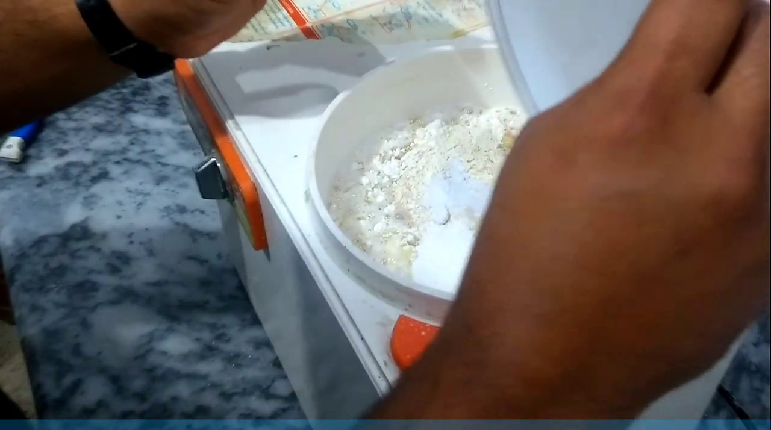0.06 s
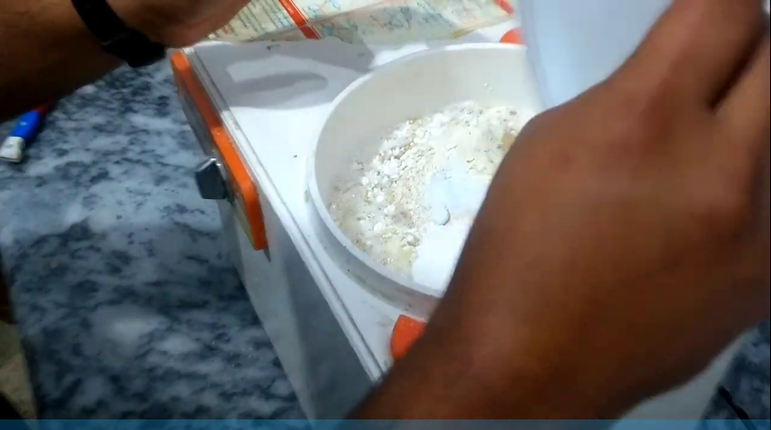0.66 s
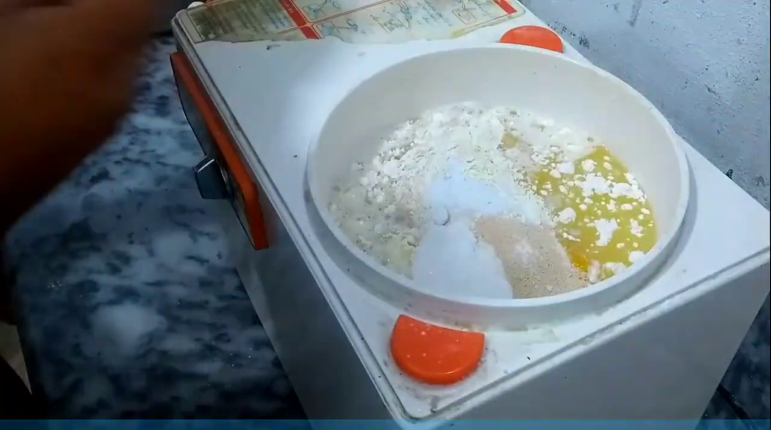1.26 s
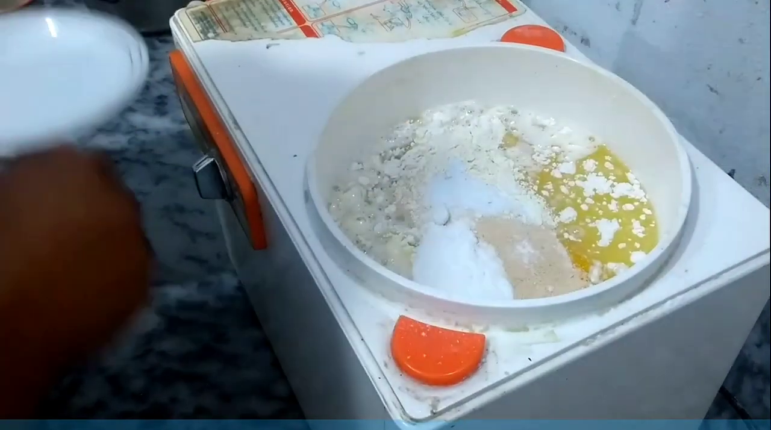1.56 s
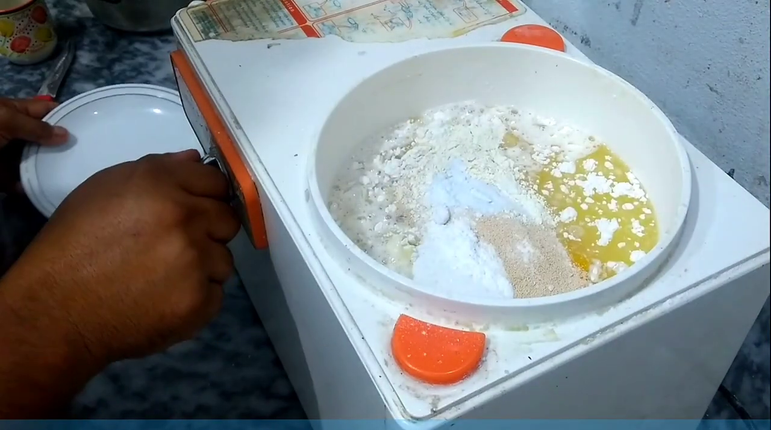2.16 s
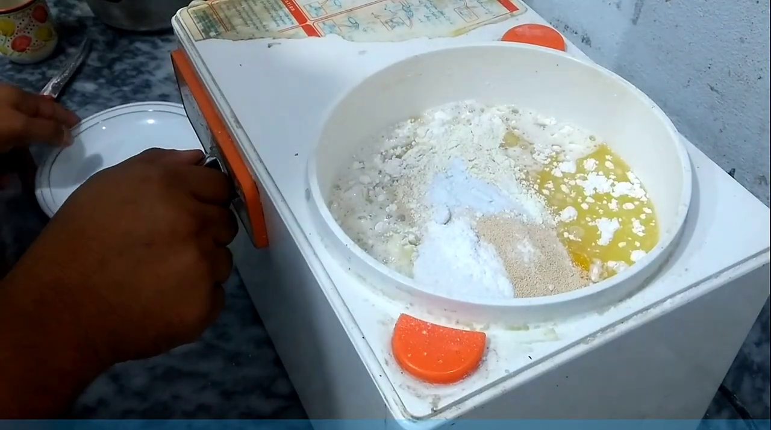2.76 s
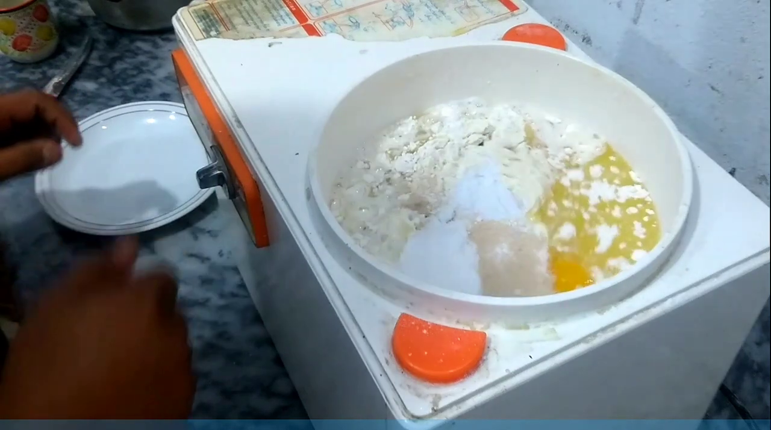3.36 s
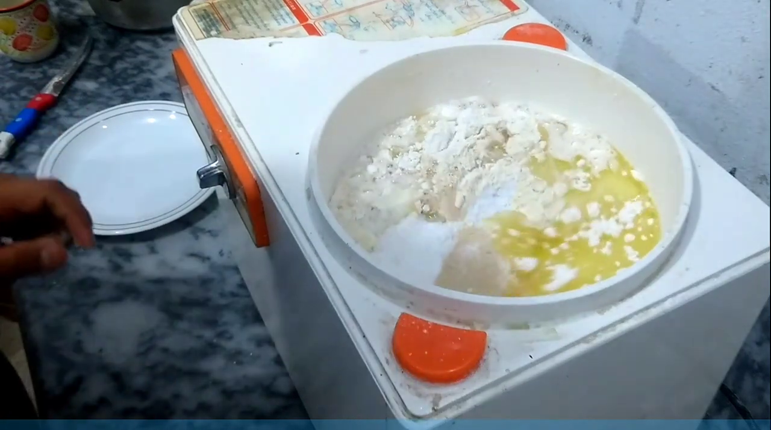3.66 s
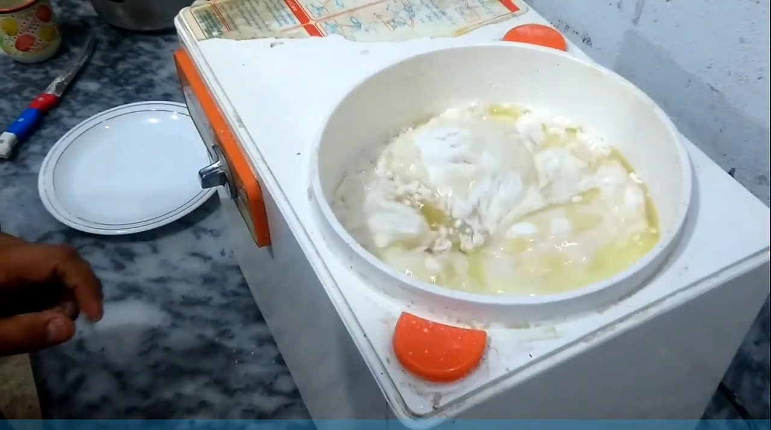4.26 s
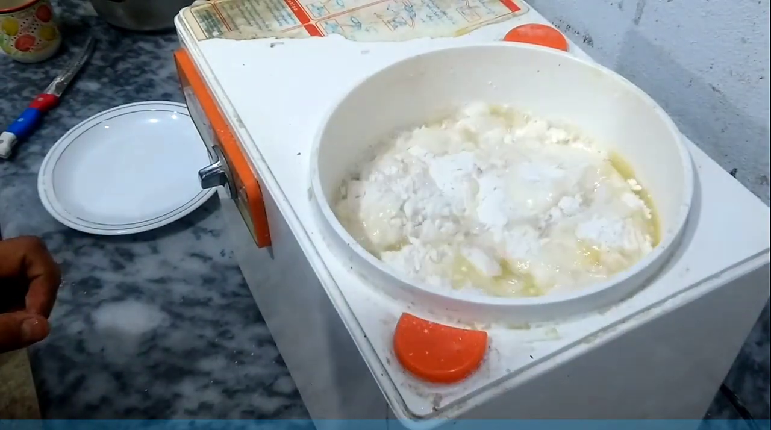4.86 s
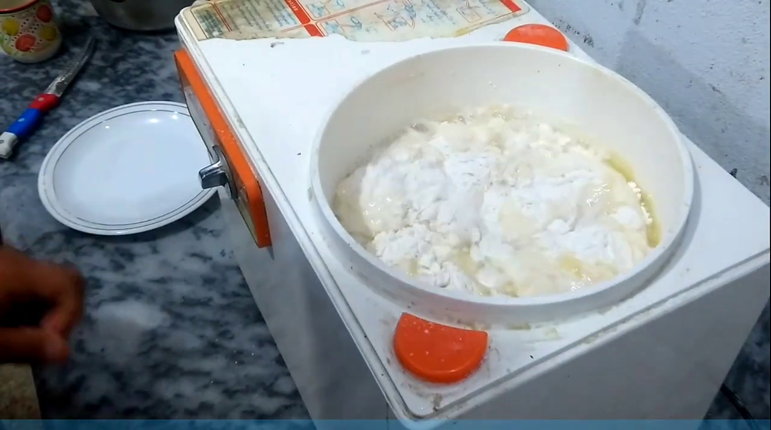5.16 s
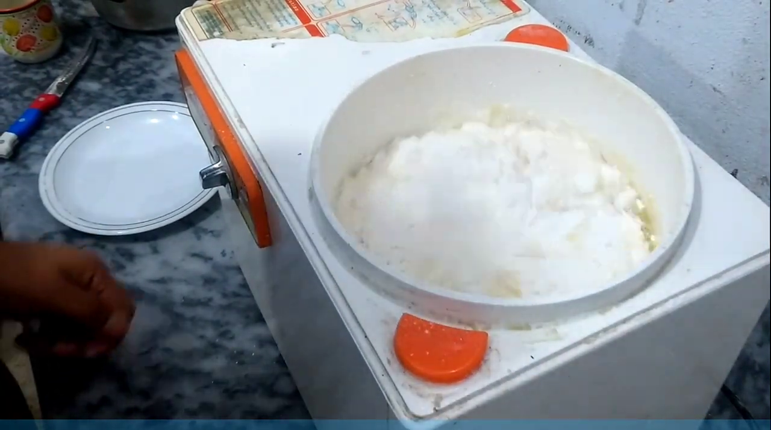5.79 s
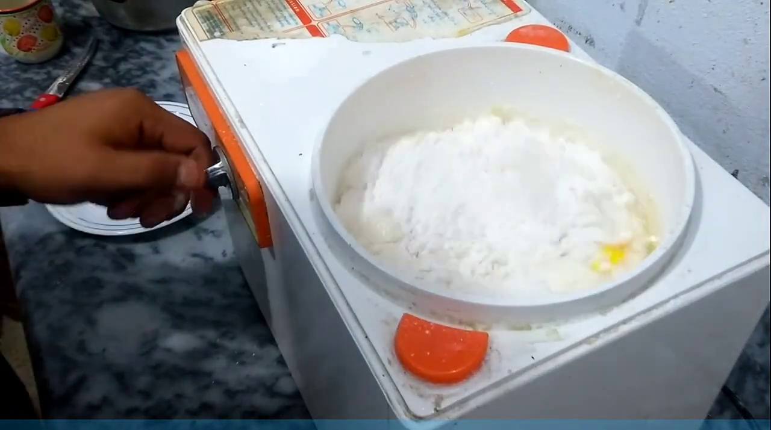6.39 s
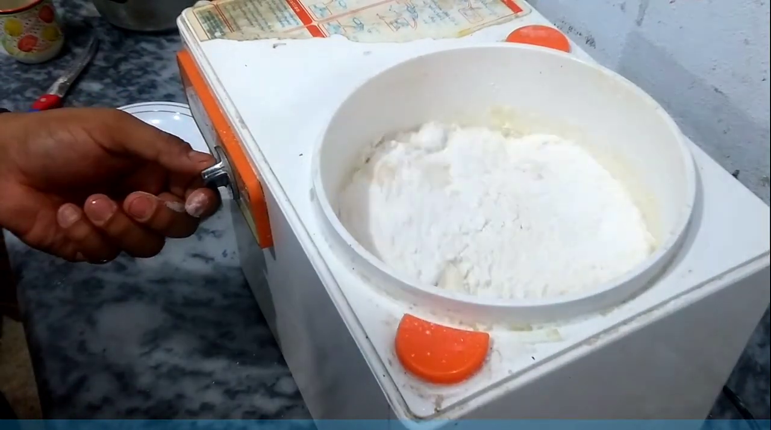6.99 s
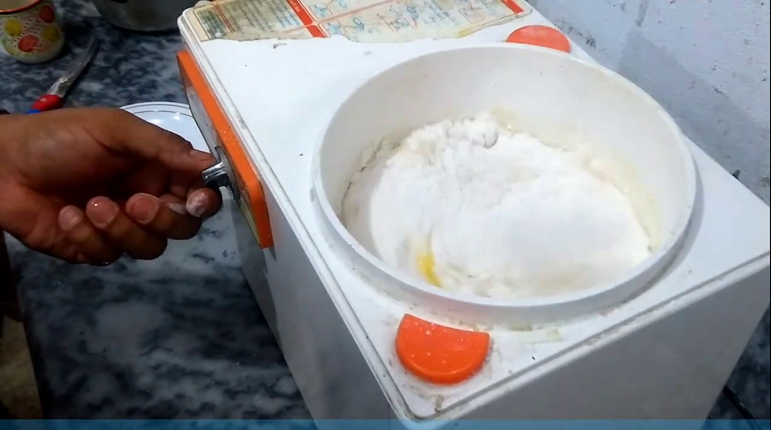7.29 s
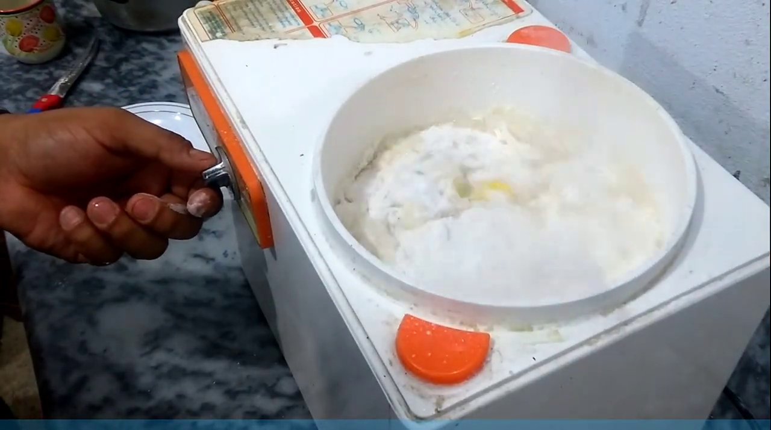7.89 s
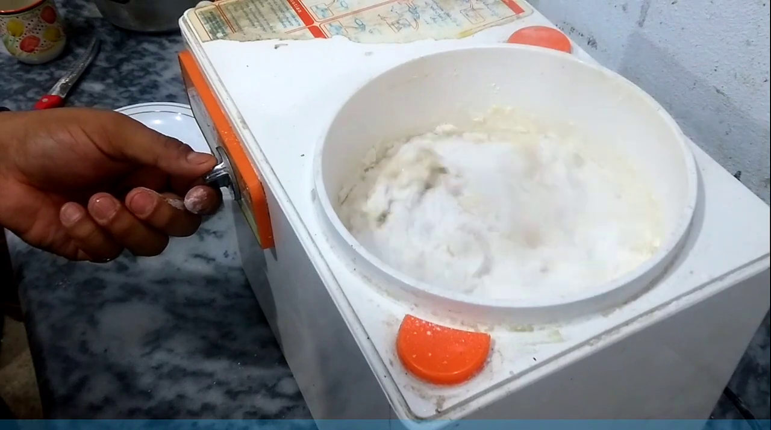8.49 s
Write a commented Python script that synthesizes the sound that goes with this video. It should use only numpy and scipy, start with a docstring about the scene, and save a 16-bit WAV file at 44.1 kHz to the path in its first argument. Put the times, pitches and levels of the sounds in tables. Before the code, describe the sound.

Four quick, hollow taps of a plate on a bowl are followed by faint handling and a ringing clink as the plate lands on stone. With a sharp click, an electric kneader begins humming, with a thin whine and low rumble. Flour hisses around the bowl, the motor slows slightly, and lumps of dough start thudding and clacking against the wall, growing louder. The microphone is close, over quiet kitchen room tone.

```python
"""A stone kitchen counter, close up on a small electric dough kneader.
A plate is tapped empty on the bowl rim, booming through the plastic housing, and set down with a ring.
The switch snaps on; the induction motor hums and slows a little under load. The paddle rumbles, flour
swishes round the bowl, and the stiffening dough starts to knock on the wall, all over quiet room tone."""
import sys
import numpy as np
from scipy import signal
from scipy.fft import rfft, irfft, next_fast_len
from scipy.io import wavfile

SR = 44100
rng = np.random.default_rng(int(sys.argv[2]) if len(sys.argv) > 2 else 0)


def master_out(mix):
    """Clip the mix to full scale and print it as 16-bit PCM to the path in sys.argv[1]."""
    frames = np.transpose(np.atleast_2d(mix))
    ceiling = np.clip(frames, -1, 1)
    pcm = np.round(ceiling * 32767).astype(np.int16)
    wavfile.write(sys.argv[1], SR, pcm)


N = 376569
TIME = np.arange(N) / SR

# rotor spinning up, then sagging: t/s, speed/(turns per s)
ROTOR_SPEED = [(2.92, 2), (3.04, 23.6), (3.25, 24.55), (4.2, 24.55), (5.1, 24.5), (5.6, 24.28),
               (6.35, 24.1), (7.2, 24.02), (8.54, 23.98)]
# load, high at the start and again as the dough stiffens: t/s, load/(0-1)
MOTOR_LOAD = [(3.0, 0.94), (3.3, 0.01), (3.9, 0.14), (4.35, 0.38), (5.3, 0.52), (6.2, 0.95), (8.54, 0.93)]
# whine partials: rotor multiple, hum multiple, free level/dB, loaded level/dB, churn lift/dB
MOTOR_TONES = [(0, 2, -48, -67, 9), (0, 3, -41, -55.5, 2), (0, 4, -55, -57, -3), (0, 5, -57, -87, 10),
               (0, 6, -55, -78, 4), (7, 0, -46.5, -50.5, 0), (14, 0, -69.5, -53, -6), (22, 0, -65, -56, 11),
               (22, 1, -45, -57, -10), (22, 2, -53.5, -69, -1), (22, 3, -54, -59.5, 4),
               (22, 4, -61, -68, -2), (23, 1, -55, -71, 2), (23, 2, -52.5, -67, -1),
               (40, 0, -56.5, -52.5, -7), (39, 2, -63.5, -53, 3), (46, 0, -60.5, -64, -3),
               (65.2, 0, -75, -64.5, 0), (66.2, 1, -60, -61, -7)]
HUM_HZ = 100.95


def motor():
    """The core hums at twice the mains rate; rotor slots add tones that sag with the speed."""
    speed, load = curve(ROTOR_SPEED), curve(MOTOR_LOAD)
    field = 2 * np.pi * HUM_HZ * TIME
    shaft = 2 * np.pi * np.cumsum(speed * (1 + .0007 * drift(8))) / SR
    side_phase = np.array([[.45], [-.45]])   # the hum reaches the two sides at different phases
    out = hum_level(load) * from_db(.5 * drift(6.7)) * np.sin(field + side_phase)
    spun_up, effort = running(), churn()
    for per_turn, harmonic, free_db, loaded_db, churn_db in MOTOR_TONES:
        level_db = free_db + load * (loaded_db - free_db) + churn_db * effort + 2.06 * drift(4)
        phase = round(per_turn) * shaft + round(harmonic) * field + rng.uniform(0, 2 * np.pi)
        out += spun_up * from_db(level_db) * np.sin(phase)
    return np.sqrt(2) * out


def hum_level(load, power_on_s=2.93, lock_in_s=3.11, drag_s=.18):
    """The magnetic hum starts faint, swells as the rotor locks in and ducks as lumps drag the paddle."""
    locked = .5 + .5 * np.tanh((TIME - lock_in_s) / .024)
    drag = sum(from_db(db) * swell(s + drag_s / 2, drag_s / 2, drag_s) for s, db, _ in DOUGH_KNOCKS)
    starting = running() * from_db(-42)
    full = from_db(-29.5 + 3.5 * churn() + 1.5 * load - 2.5 * per_sample(drag / drag.max()))
    return (TIME > power_on_s) * ((1 - locked) * starting + locked * full)


def running():
    """Fade from 0 at rest to 1 once the rotor has spun up."""
    speed = curve(ROTOR_SPEED)
    return np.clip((speed - speed[0]) / (speed[-1] - speed[0]), 0, 1)


def churn():
    """One swell of effort, 0 to 1, as the first turns break up the dry heap."""
    return per_sample(swell(3.43, rise_s=.13, fall_s=.32))


# fader ride of the dough pressing on the bowl: t/s, level/dB
DOUGH_PRESSURE = [(3.05, -56), (3.45, -36.5), (3.9, -42.5), (4.8, -49.5), (5.45, -39.5), (6.35, -38.5),
                  (6.95, -34), (7.45, -39.5), (8.54, -40.5)]
# colour of the paddle rumble: f/Hz, level/dB
PADDLE_RUMBLE = [(35, -18), (48, -5), (60, -2.5), (74, -14), (86, 17.5), (100, 1), (130, 12), (170, 9.5),
                 (195, -2), (260, -0.5), (400, -9)]
# colour of the drive rattle: f/Hz, level/dB
DRIVE_RATTLE = [(300, -3), (500, -4.5), (600, -6.5), (750, -4.5), (900, -5.5), (1150, -7.5), (1350, -16.5),
                (1700, -13.5), (2100, -14), (3000, -19.5)]


def mixing():
    """The paddle rumbles, dough nudges housing and bowl, and the drive rattles, most in the churn."""
    load, dough_db = curve(MOTOR_LOAD), curve(DOUGH_PRESSURE)
    rumble = from_db(-34 - 3 * load + 1.6 * drift(7.6)) * noise(PADDLE_RUMBLE)
    boom_modes = [mode for mode in HOUSING_MODES if 190 < mode[0] < 500]
    nudges = kitchen(ring(grains(400, 2.5), boom_modes, sustain=.7), wet_db=-2, t60=.3)
    body = from_db(dough_db + 3 + 1.36 * drift(13)) * rms_one(filtered(nudges, 4, 190, "high"))
    patter = bowl(grains(500, 2), soft_hz=3000, travel_s=0, sustain=1.4)
    wall = from_db(dough_db - 13) * rms_one(kitchen(patter, wet_db=-5, t60=.3))
    ticks = crack(grains(140, 2.2), DRIVE_RATTLE, t60=.025, tail_db=-8, tail_t60=.3, rise_s=.001)
    rattle = from_db(-44.5 + 5.5 * churn() + .5 * load) * rms_one(ticks)
    return running() * (rumble + body + wall + rattle + groans())


# groans of the drive: t/s, peak level/dB, length/s, f/Hz
DRIVE_GROANS = [(3.43, -43.5, 0.48, 501), (5.5, -46.5, 0.32, 489)]


def groans(waver_hz=11.64):
    """A wavering note swells and dies where the paddle meets resistance and the drive strains."""
    waver = 2 * np.pi * np.cumsum(waver_hz * drift(25)) / SR
    out = np.zeros(N)
    for s, db, length, hz in DRIVE_GROANS:
        envelope = from_db(db) * per_sample(swell(s, length / 2, length / 2))
        out += envelope * np.sin(2 * np.pi * hz * TIME + waver)
    return np.sqrt(2) * out


# lumps thrown against the bowl: t/s, level/dB, hardness/dB
DOUGH_KNOCKS = [(5.611, -30, 3.5), (5.943, -29.5, -8), (6.003, -28, 1), (6.314, -20.5, -4.5),
                (6.398, -25.5, -12), (6.491, -28, -6), (6.657, -27, -16), (6.771, -23, 5),
                (6.847, -19, 2.5), (6.922, -17, 4), (7.004, -20.5, 5), (7.096, -30, 6.5), (7.162, -24.5, 1),
                (7.274, -23.5, 1), (7.333, -23.5, -8), (7.489, -19.5, 7.5), (7.587, -22.5, 3.5),
                (7.796, -28, -10), (8.054, -24, 4), (8.188, -14, 7), (8.296, -16.5, 8), (8.47, -25, -4.5)]
# colour of the dough slap: f/Hz, level/dB
DOUGH_SLAP = [(250, -22), (370, 5.5), (480, 3), (620, -31), (760, 7), (920, -14), (1200, -1), (1550, -8),
              (2000, -13), (3000, -24), (4500, -58)]


def knocks():
    """Dough lumps strike the bowl: its wall clacks, the housing booms and the dough slaps softly."""
    s, db, hard_db = np.transpose(DOUGH_KNOCKS)
    boom = filtered(housing(clicks(s, db + 2.5), soft_hz=430), 3, 175, "high")
    wall = bowl(clicks(s, db + hard_db - 1), soft_hz=2400, travel_s=.00296, sustain=.74)
    slap = crack(clicks(s, db + hard_db - 12.5), DOUGH_SLAP,
                 t60=.045, tail_db=-20, tail_t60=.26, rise_s=.0008)
    return kitchen(boom, wet_db=-16, t60=.4) + kitchen(wall, wet_db=-8, t60=.35) + slap


# boom of the plastic housing: f/Hz, level/dB, t60/s
HOUSING_MODES = [(87.4, -20.5, 0.7), (168, -20, 0.4), (214.5, -7.5, 0.36), (232, 0.8, 0.18),
                 (245.8, -12.3, 0.24), (269, -13.5, 0.22), (299, -17, 0.24), (342, -19.3, 0.28),
                 (472, -21.5, 0.25), (595, -7, 0.06)]


def housing(hits, soft_hz):
    """A blow booms through the machine, which rocks back onto its feet; nothing sounds below the boom."""
    rebound = from_db(-14) * later(hits, .043)
    push = filtered(hits + rebound, 2, soft_hz)
    return filtered(struck(push, HOUSING_MODES, travel_s=.0029), 6, 76, "high")


# clack of the bowl wall: f/Hz, level/dB, t60/s
BOWL_MODES = [(349.8, -10, 0.12), (370.7, -13, 0.13), (489, -12.5, 0.062), (742, -14.5, 0.085),
              (770, -17, 0.077), (1032, -25, 0.058), (1146, -9.5, 0.082), (1170, -19, 0.044),
              (1287, -10.5, 0.037), (1426, -16.5, 0.051), (1521, -11.5, 0.046), (1704, -20.5, 0.043),
              (1830, -17, 0.03), (2030, -26, 0.068)]


def bowl(hits, soft_hz, travel_s, sustain):
    """The thin bowl wall clacks without bass; a soft blow leaves its top modes quiet."""
    return struck(filtered(hits, 2, [150, soft_hz], "band"), BOWL_MODES, travel_s, sustain)


# plate tapped on the bowl rim: t/s, level/dB, brightness/dB
RIM_TAPS = [(.038, -14, 3.5), (0.225, -13, 5), (0.4247, -14, -9), (0.6349, -12, 0.5)]
# colours of each tap's clack, tick and sugar grit: f/Hz, level/dB
RIM_CLACK = [(300, 13.5), (400, -4), (570, 6.5), (850, -0.5), (1150, 2.5), (1700, -13), (2100, -2),
             (2800, -20), (4000, -37), (6000, -50)]
RIM_TICK = [(1200, 4), (2900, 0), (4200, -9)]
SUGAR_GRIT = [(2000, -21), (2900, 7), (4500, -1.5), (6500, 4.5), (10500, 1.5), (14000, -26)]


def taps():
    """The held plate clacks on the rim: plate and bowl ring, the housing booms and loose sugar jumps."""
    s, db, bright_db = np.transpose(RIM_TAPS)
    boom = housing(clicks(s, db - 1.1), soft_hz=860)
    held = plate_ring(clicks(s, db - 22), soft_hz=3250, sustain=.43)
    rim = bowl(clicks(s, db - 15), soft_hz=5000, travel_s=.00134, sustain=1.34)
    clack = crack(clicks(s, db - 10), RIM_CLACK, t60=.11, tail_db=-6, tail_t60=.2, rise_s=.0017)
    grit = crack(clicks(s, db + bright_db - 32), SUGAR_GRIT,
                 t60=.067, tail_db=3.5, tail_t60=.24, rise_s=.0013)
    tick = crack(clicks(s + .0005, db - 14), RIM_TICK, t60=.035, tail_db=-24, tail_t60=.2, rise_s=.0002)
    ringing = kitchen(boom, wet_db=-22, t60=.4) + kitchen(held + rim, wet_db=-6, t60=.35)
    return ringing + tick + clack + grit


# plate meeting the counter: t/s, level/dB
PLATE_LANDING = [(2.25, -8.5)]


def plate():
    """The plate lands on stone with a short chatter, then rings on."""
    s, db = np.transpose(PLATE_LANDING)
    ringing = plate_ring(clicks(s, db - 8), soft_hz=7500, sustain=.99)
    colour = around(PLATE_MODES, width_hz=90, widen=.02)
    chatter = crack(clicks(s, db - 7.2), colour, t60=.14, tail_db=-2, tail_t60=.26, rise_s=.0004)
    return kitchen(ringing, wet_db=-6, t60=.27) + chatter


# ring of the plate: f/Hz, level/dB, t60/s
PLATE_MODES = [(760, -21, .06), (1036, -1, .33), (1114, -9, .24), (1793, -9.5, .29), (1840, -12.5, .2),
               (2480, -12, .09), (2805, -10, .24), (3075, -15, .18), (3135, -16, .2), (3300, -16.5, .2),
               (3738, -11, .23), (4221, -14, .28), (4595, -17, .14), (5130, -17, .12), (5860, -13.5, .19),
               (6390, -21, .25), (7715, -16, .15), (7985, -14, .23), (8500, -20, .2), (9440, -19, .17),
               (10650, -20, .16), (12680, -27.5, .14)]


def plate_ring(hits, soft_hz, sustain):
    """The plate's clear modes; nothing sounds below about 550 Hz."""
    push = filtered(hits, 2, soft_hz)
    return filtered(ring(push, PLATE_MODES, sustain), 4, 550, "high")


# the catch slips, the contact snaps, the lever bounces and settles: t/s, level/dB
SWITCH_CLICKS = [(2.915, -32), (2.9193, -12.5), (2.924, -18), (2.928, -17.5)]
# ring of lever, spring and panel: f/Hz, level/dB
SWITCH_MODES = [(237, 3), (630, -4.5), (974, 1.5), (1410, 1.5), (1760, 1), (2150, 3.5), (2700, 1),
                (3080, -0.5), (3750, -2), (3970, -4), (5000, -2), (5980, -2), (6310, 1), (7300, -2),
                (7900, 0), (8700, -2.5), (10200, -1), (10850, -0.5), (12200, -9), (13400, -7)]


def switch():
    """The contact snaps and bounces; lever, spring and panel ring briefly, the high modes least."""
    hits = clicks(*np.transpose(SWITCH_CLICKS))
    colour = around(SWITCH_MODES, width_hz=255, widen=.011)
    snap = crack(hits, colour, t60=.036, tail_db=-8.5, tail_t60=.26, rise_s=.00027)
    modes = [(hz, db, .16 * np.sqrt(1000 / max(hz, 1000))) for hz, db in SWITCH_MODES]
    panel = ring(filtered(hits, 2, 160, "high"), modes)
    return from_db(-1.7) * snap + kitchen(from_db(-21) * panel, wet_db=-5, t60=.3)


# colour of the powder hiss: f/Hz, level/dB
POWDER_HISS = [(1800, -5.5), (2600, 2), (3500, 2), (4600, 0), (6000, -0.5), (8600, 0), (11000, -1.5),
               (12000, -7), (14500, -12)]
# fader ride of loose flour circling the bowl: t/s, level/dB
FLOUR_SWIRL = [(3.1, -51), (3.5, -40), (3.85, -49), (4.4, -48), (4.95, -51), (5.6, -47), (6.2, -44.5),
               (7.15, -52), (8.0, -49.5), (8.54, -54)]
# flour and sugar sliding off the paddle: t/s, peak level/dB, length/s, brightest f/Hz
FLOUR_SPILLS = [(3.41, -43, 0.055, 9050), (3.85, -48, 0.063, 6560), (4.005, -44, 0.034, 11000),
                (4.22, -49, 0.29, 7960), (4.34, -35.5, 0.06, 4540), (4.41, -40.5, 0.1, 7900),
                (5.235, -46, 0.18, 8700), (5.735, -41, 0.053, 3400), (5.762, -39, 0.056, 6000),
                (6.005, -33.5, 0.063, 7640), (6.13, -44, 0.029, 8700), (6.312, -41, 0.056, 5840),
                (6.87, -45, 0.095, 7460), (6.91, -40, 0.061, 3550), (7.78, -51, 0.055, 6500),
                (7.87, -44.5, 0.077, 6700), (7.98, -48, 0.058, 7000)]
# hands and plate sliding: t/s, peak level/dB, length/s, brightest f/Hz
HAND_SLIDES = [(1.01, -57.5, 0.14, 6640), (1.22, -56, 0.28, 7000), (1.4, -52, 0.19, 8400),
               (1.89, -48, 0.13, 7650), (1.95, -54, 0.063, 3470), (2.19, -53.5, 0.67, 6400)]


def swishes(rustle_db=-58.5, lift_db=6.5, width_octaves=.54):
    """Grains slide over plastic, hands and plate brush; each swish lifts its own part of the treble."""
    bed_power = from_db(2 * rustle_db) + running() * from_db(2 * curve(FLOUR_SWIRL))
    s, db, lengths, bright_hz = np.transpose(list(FLOUR_SPILLS) + list(HAND_SLIDES))
    powers = np.array([swell(at, .3 * length, .7 * length) for at, length in zip(s, lengths)]) ** 2
    hiss, out = noise(POWDER_HISS), 0
    edges_hz = [2600, 3100, 3700, 4600, 5700, 6500, 7400, 8300, 9300, 10400, 11500, 16000]
    for low_hz, top_hz in zip(edges_hz, edges_hz[1:]):
        band = signal.sosfiltfilt(signal.butter(8, top_hz, fs=SR, output="sos"), hiss)
        hiss = hiss - band   # peel the bands off from the bottom up
        focus = np.exp(-(np.log2(np.sqrt(low_hz * top_hz) / bright_hz) / width_octaves) ** 2)
        slide_power = per_sample(from_db(2 * (db + lift_db * focus)) @ powers)
        out += band * np.sqrt(bed_power + slide_power) * from_db(2.2 * drift(16))
    return from_db(drift(120)) * out   # fast, grainy flicker


# hands meeting plate and knob: t/s, level/dB
HAND_BUMPS = [(0.93, -42), (1.118, -40.5), (1.15, -46), (1.315, -43), (1.35, -41), (1.39, -45),
              (2.734, -33)]
# dull colour of a bump: f/Hz, level/dB
BUMP_COLOUR = [(200, -15), (500, -5), (800, -1.5), (1400, -18.5), (2200, -22), (4000, -32)]


def handling():
    """Hands bump softly against plate and knob."""
    hits = clicks(*np.transpose(HAND_BUMPS))
    return crack(hits, BUMP_COLOUR, t60=.11, tail_db=-19, tail_t60=.79, rise_s=.01)


# colour of the room tone: f/Hz, level/dB
ROOM_TONE = [(30, -19), (60, -7), (90, 9.5), (150, 1), (210, 5), (400, 0), (900, -4), (1500, -8.5),
             (3000, -17), (7000, -51), (11000, -17), (14500, -22)]


def room_tone():
    """The air of the room lays a quiet, steady bed."""
    return from_db(-53.5) * noise(ROOM_TONE)


def kitchen(x, wet_db, t60):
    """Direct sound plus diffuse reflections, different on each side."""
    t = np.arange(SR // 2) / SR
    tail = rng.standard_normal((2, len(t))) * from_db(-60 * t / t60) * (t > .004)
    tail /= np.sqrt(np.sum(tail ** 2, axis=1, keepdims=True))
    return x + from_db(wet_db) * signal.fftconvolve(x[None], tail, axes=1)[:, :N]


# stereo image of the noise layers: f/Hz, left-right correlation/(0-1)
STEREO_LIKENESS = [(60, 0.092), (250, 0.13), (800, 0.9), (1500, 1), (2350, 1), (3300, 0.2), (4700, 0.69),
                   (8000, 0.26), (14000, 0.04)]


def noise(spectrum):
    """Stereo noise of a given colour, falling steeply past its ends; rms 1."""
    size = next_fast_len(N, real=True)
    hz = np.arange(size // 2 + 1) * SR / size + 1
    edges = np.minimum(1, np.minimum(hz / spectrum[0][0], spectrum[-1][0] / hz)) ** 4
    mid, side = rfft(rng.standard_normal((2, size))) * from_db(at_hz(spectrum, hz)) * edges
    alike = np.clip(at_hz(STEREO_LIKENESS, hz), 0, 1)
    pair = np.sqrt(1 + alike) * mid + np.sqrt(1 - alike) * side * [[1], [-1]]
    return rms_one(irfft(pair, size)[:, :N])


def crack(hits, spectrum, t60, tail_db, tail_t60, rise_s):
    """Dense resonances, played as noise: a quick attack at each hit, a fast decay and a room tail."""
    fast, slow = (signal.lfilter([1], [1, -from_db(-120 / (t * SR))], hits ** 2 + 1e-18)
                  for t in (t60, tail_t60))
    decay = np.sqrt(fast + from_db(2 * tail_db) * slow)
    pole = np.exp(-2 / (rise_s * SR))
    envelope = signal.lfilter([(1 - pole) ** 2], [1, -2 * pole, pole ** 2], decay)
    return envelope * noise(spectrum)


def around(peaks, width_hz, widen):
    """Spectrum of resonances clustered round each peak; the clusters widen with pitch."""
    hz = np.geomspace(150, 14400, 600)
    power = sum(from_db(2 * db) / (1 + ((hz - centre) / (width_hz + widen * centre)) ** 2) ** 2
                for centre, db, *_ in peaks)
    return np.transpose([hz, 10 * np.log10(power)])


def ring(force, modes, sustain=1):
    """Each mode rings as a dying sine; sustain scales all ring times."""
    out = np.zeros(N)
    for hz, db, t60 in modes:
        r, w = from_db(-60 / (t60 * sustain * SR)), 2 * np.pi * hz / SR
        out += from_db(db) * signal.lfilter([0, np.sin(w)], [1, -2 * r * np.cos(w), r * r], force + 1e-18)
    return out


def struck(force, modes, travel_s, sustain=1):
    """Bending waves cross a thin wall in travel_s at 1 kHz; the lower modes speak later."""
    return sum(ring(later(force, travel_s * np.sqrt(1000 / mode[0])), [mode], sustain) for mode in modes)


def clicks(times, db):
    """One impulse for each contact."""
    out = np.zeros(N)
    out[np.round(np.asarray(times) * SR).astype(int)] = from_db(db)
    return out


def grains(per_s, spread_db):
    """Random impulses of uneven size and sign."""
    sizes = from_db(spread_db * np.minimum(rng.exponential(1, N), 4)) * rng.choice([-1, 1], N)
    return sizes * (rng.random(N) < per_s / SR)


def swell(peak_s, rise_s, fall_s):
    """A rounded attack to 1 at peak_s, then an exponential release; one value per millisecond."""
    t = np.arange(0, N / SR, .001) - peak_s
    return np.exp(-np.minimum(np.where(t < 0, (t / rise_s) ** 2, t / fall_s), 30))


def drift(rate_hz):
    """Random modulation up to about rate_hz; rms 1."""
    return rms_one(per_sample(rng.standard_normal(int(2 * rate_hz * N / SR) + 2)))


def per_sample(envelope):
    """Stretch a coarse envelope over all samples."""
    return np.interp(np.linspace(0, len(envelope) - 1, N), np.arange(len(envelope)), envelope)


def curve(points):
    """Read an automation curve at every sample."""
    return np.interp(TIME, *np.transpose(points))


def at_hz(points, hz):
    """Read a spectrum on a log-frequency axis."""
    f, value = np.transpose(points)
    return np.interp(np.log(np.maximum(hz, 1)), np.log(f), value)


def filtered(x, order, hz, kind="low"):
    """Low-, high- or band-pass with a flat passband."""
    return signal.sosfilt(signal.butter(order, hz, kind, fs=SR, output="sos"), x)


def later(x, seconds):
    """Delay one channel."""
    return np.interp(np.arange(N) - seconds * SR, np.arange(N), x, left=0)


def from_db(db):
    """Decibels to gain."""
    return 10 ** (np.asarray(db) / 20)


def rms_one(x):
    """Scale to rms 1."""
    return x / np.sqrt(np.mean(x ** 2) + 1e-20)


def scene():
    """Everything on the counter, over the room tone."""
    return room_tone() + taps() + plate() + handling() + switch() + motor() + mixing() + knocks() + swishes()


# lean of the microphone pair: f/Hz, left minus right/dB
MIC_BALANCE = [(60, -11), (101, -2.0), (230, -3.5), (700, -0.5), (1100, -0.5), (2400, -1.5), (4400, -2),
               (8000, -6), (15000, -4.5)]
# phase lag of the left port: f/Hz, lag/rad
MIC_LAG = [(1400, 0), (2150, 2.9), (2550, 3.3), (3200, 6.1), (3800, 6.6), (4400, 9), (4900, 9.6),
           (5900, 12.5), (8400, 18.9), (10800, 25), (14000, 33)]


def record(dry, cutoff_hz=14450):
    """Two microphone ports: the left is weaker and gets the treble later; the top is cut."""
    size = next_fast_len(N + SR // 10, real=True)
    hz = np.arange(size // 2 + 1) * SR / size
    left, right = rfft(dry, size)
    lag = np.interp(hz, *np.transpose(MIC_LAG))
    tilt = from_db(at_hz(MIC_BALANCE, hz) / 2)
    pair = irfft(np.array([left * tilt * np.exp(-1j * lag), right / tilt]), size)[:, :N]
    return signal.sosfilt(signal.ellip(12, .1, 70, cutoff_hz, fs=SR, output="sos"), pair)


dry = scene()
out = record(dry)
master_out(out)
```